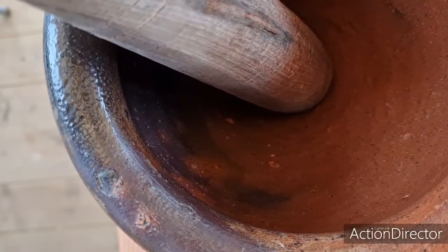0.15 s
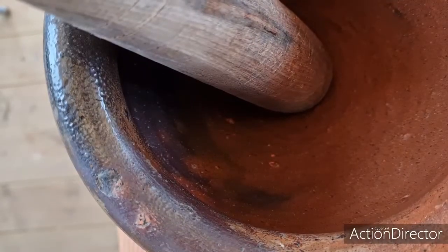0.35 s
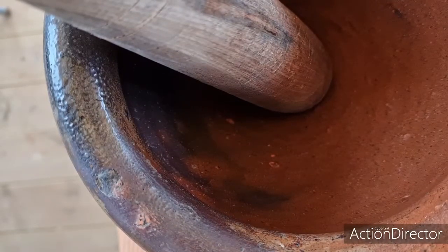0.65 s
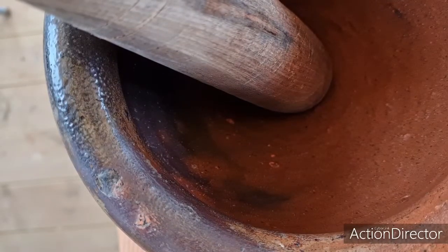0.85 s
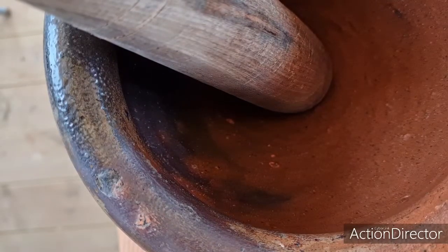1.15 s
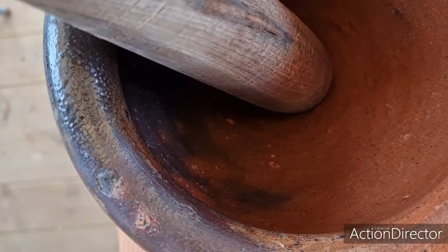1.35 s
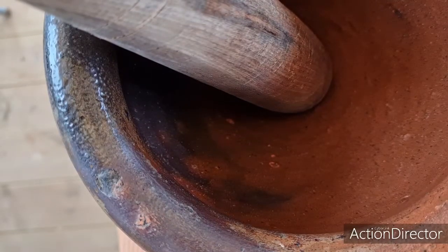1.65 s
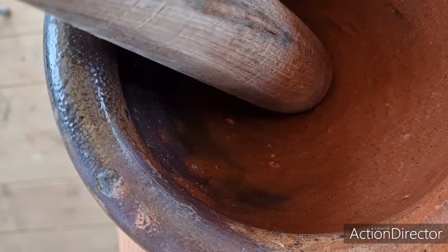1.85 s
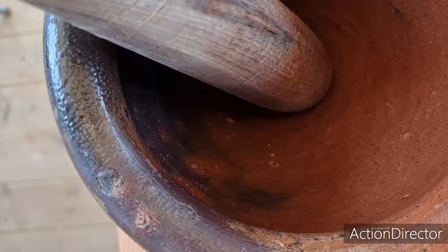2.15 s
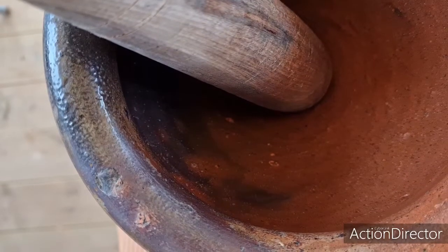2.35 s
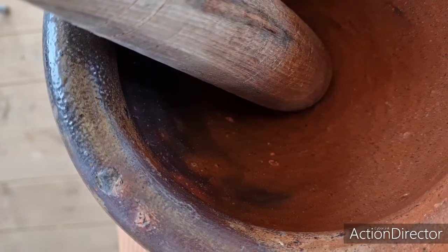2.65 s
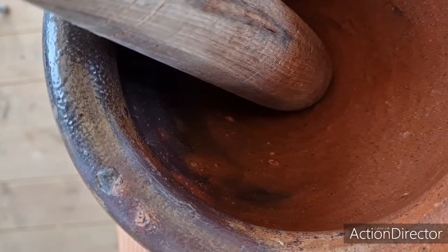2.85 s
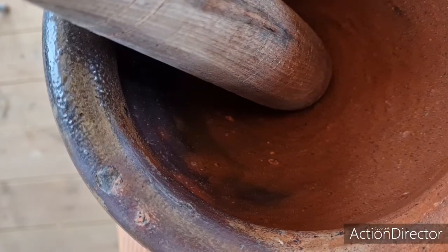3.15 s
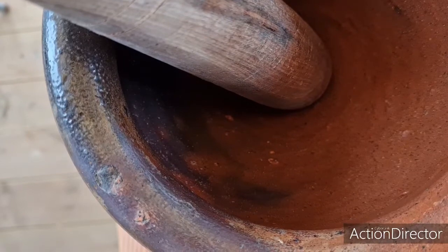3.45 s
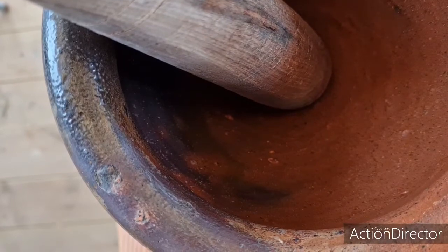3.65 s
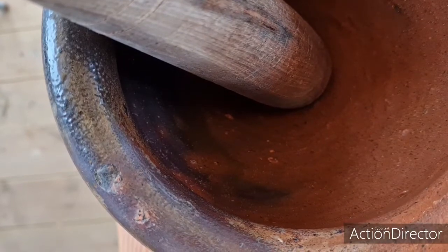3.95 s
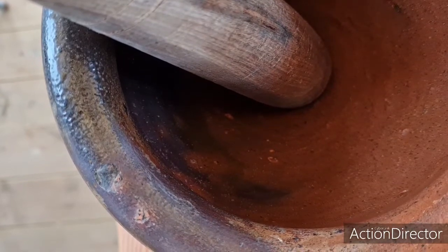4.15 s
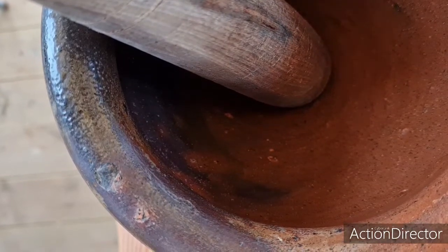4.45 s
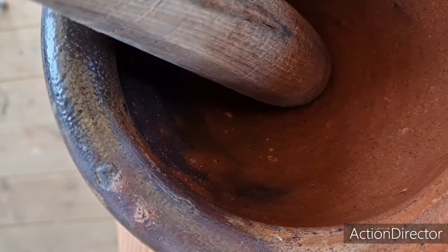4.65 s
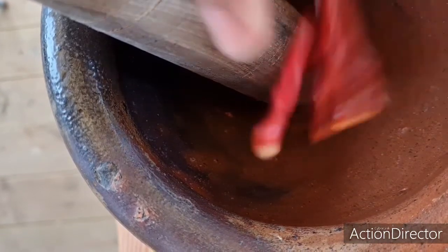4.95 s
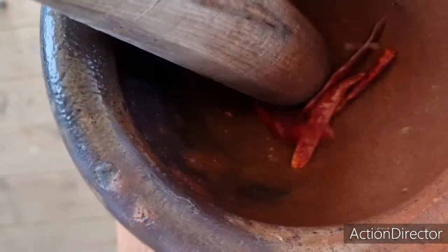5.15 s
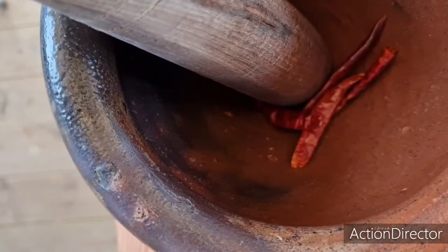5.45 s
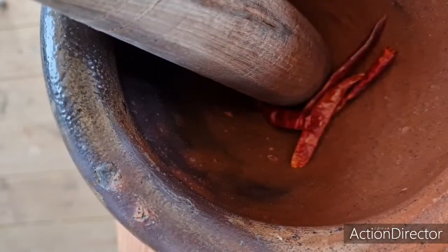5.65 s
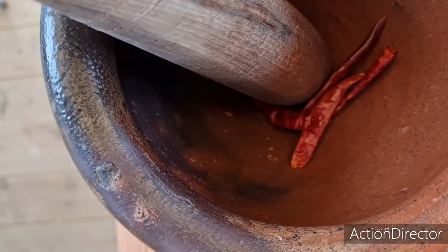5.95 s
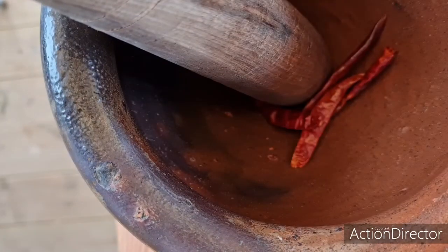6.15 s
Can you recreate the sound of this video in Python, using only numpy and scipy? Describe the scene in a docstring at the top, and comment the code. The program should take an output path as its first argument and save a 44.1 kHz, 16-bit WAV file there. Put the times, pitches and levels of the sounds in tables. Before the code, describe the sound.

Soft, low room noise of a quiet kitchen runs throughout. In the first 0.5 seconds come faint far bumps and scuffs, then a compact dull thud at about 0.44. After a pause, a light swish starts near 1.2, and between 1.4 and 1.75 there is a wet gulp: sticky clicks and small gliding, bubbly tones, trailed by faint swishes. From 2.0 to 4.4 a hand rubs close to the microphone in uneven hissing strokes, with sharp plastic-like ticks, strongest around 3.0 to 3.5. A faint deep motor hum swells after 3.5, highest near 4.8. At 5.0 to 5.3 dried chilies fall into a clay bowl, a quick bright papery rustle and crackling taps with short earthen ringing, leaning left. Rubbing and ticks return from 5.5 to 6.0 as the hum fades; a last small tick comes at 6.24. Close, dry stereo, slight room tail.

```python
"""Far bumps and a dull thud come first, under the soft noise of a quiet kitchen; all are shaped noise or sine.
Swishes, wet clicks and a gulp of gliding tones follow, then a hand rubs and ticks close to the microphone:
friction is dense random slips, each tick a spray of slips that rings the casing. Dried chilies rustle and
drop into a clay bowl, heard through its resonances, and the rubbing returns while a far motor swells and fades."""
import sys
import numpy as np
from scipy import signal
from scipy.io import wavfile

SR = 44100
rng = np.random.default_rng(int(sys.argv[2]) if len(sys.argv) > 2 else 0)


def to_wav(sig):
    """Store sig (one row per channel, or 1-D mono) as 16-bit WAV at the path in sys.argv[1].

    Samples outside -1..1 are clipped; the rate is SR.
    """
    pcm = np.clip(np.atleast_2d(sig), -1, 1) * 32767
    pcm = np.round(pcm).astype(np.int16)
    wavfile.write(sys.argv[1], SR, pcm.T)  # frames by channels


N = 276948

# likeness of left and right over pitch: pitch_hz, likeness (1 same, 0 unrelated)
LIKENESS = [(40, 0.84), (200, 0.91), (700, 0.19), (2500, 0), (6000, 0), (16000, 0.11)]
# resonances of the wet clicks and the gulp's squelch: pitch_hz, width_hz, level_db
CAVITY_MODES = [(625, 240, -1.5), (1096, 71, -6.5), (2250, 230, 1.5), (2900, 290, 6), (3430, 120, 14),
                (3990, 490, 7.5), (6050, 350, -3), (6530, 700, -1.5), (10800, 2700, -0.5)]
# resonances of the clay bowl: pitch_hz, width_hz, level_db
BOWL_MODES = [(664, 120, 4), (912, 80, 0), (1590, 130, 2.5), (2020, 85, -4), (2624, 110, 8), (2800, 77, 7),
              (3030, 64, 0), (3650, 150, -4), (4010, 85, -5.5), (4700, 99, -7.5), (5650, 260, -4),
              (6500, 240, -13), (7530, 200, -4.5), (9500, 150, -8.5)]
# rubbing strokes of the hand: start_s, attack_s, hold_s, hiss_db, sag_db_per_s,
# rasp_db (re hiss), hollow_db (re hiss), pan_db (left over right)
RUBS = [(2.019, 0.032, 0.23, -69, 1, -10, -3.5, -3.5), (2.37, 0.047, 0.11, -45.5, -37, -11.5, -15.5, -6.5),
        (2.55, .01, .13, -57.5, 46, -8.5, -7.5, -1.5), (2.91, 0.036, 0.022, -63, 0, -9, -6, 0),
        (2.97, 0.033, 0.23, -38, 20, -4, -15.5, 0.5), (3.232, 0.021, 0.24, -49.5, -1, -5, -12.5, 1),
        (3.5, .015, 0.09, -52.5, 22, -8, -9, 0), (3.724, .008, .21, -49, -15, -6, -12, 0),
        (3.965, .02, 0.022, -42, 50, -11.5, -17.5, 1.5), (4.071, .012, .13, -54.5, -4, -2.5, -3.5, 0),
        (4.245, .015, 0.017, -42, 32, -12.5, -7, -1.5), (4.32, 0.019, .12, -71.5, 0, -8.5, -3, 2),
        (5.504, 0.036, .05, -35.5, 0, -3, -16, 1.5), (5.6, .02, 0.22, -46.5, 32, -2, -17, 1),
        (5.886, 0.024, 0.069, -51, -2, -3, -10.5, 0)]


def from_db(db):
    """Decibels to amplitude gain."""
    return 10 ** (np.asarray(db) / 20)


def rms_one(x):
    """Scale to unit RMS over all samples and channels."""
    return x / np.sqrt(np.mean(x ** 2) + 1e-30)


def in_time(rows):
    """Join (time in s, value) rows by straight lines over the whole scene."""
    s, values = np.transpose(rows)
    return np.interp(np.arange(N) / SR, s, values)


def at_hz(points, hz):
    """Read a (pitch in Hz, value) table on a log-frequency axis."""
    table_hz, values = np.array(points).T
    return np.interp(np.log(hz), np.log(table_hz), values)


def band(x, low_hz, high_hz):
    """Causal band-pass."""
    edges_hz = [low_hz, min(high_hz, .48 * SR)]
    return signal.sosfilt(signal.butter(3, edges_hz, "band", fs=SR, output="sos"), x)


def drift(rate_hz):
    """Random curve through rate_hz knots a second, with a spread near 1."""
    knots = rng.standard_normal(int(N / SR * rate_hz) + 2)
    return np.interp(np.arange(N) / SR * rate_hz, np.arange(len(knots)), knots)


def pair(x, alike):
    """Mix two unrelated signals into left and right with the given likeness."""
    alike = np.clip(alike, -1, 1)
    middle = np.sqrt((1 + alike) / 2) * x[0]
    side = np.sqrt((1 - alike) / 2) * x[1]
    return middle + side * np.array([[1], [-1]])


def panned(x, pan_db):
    """Tilt left against right at constant power; positive leans left."""
    gains = from_db(np.array([[.5], [-.5]]) * pan_db)
    return x * gains / np.sqrt(np.mean(gains ** 2, axis=0))


def add(out, s, sound):
    """Mix a short sound in at time s."""
    at = max(round(s * SR), 0)
    out[:, at:at + sound.shape[-1]] += sound[..., :out.shape[-1] - at]


def resonate(x, hz, width_hz):
    """One two-pole resonance with gain 1 on top."""
    r = np.exp(-np.pi * width_hz / SR)
    feed = np.array([1, 0, -1]) * (1 - r * r) / 2
    back = [1, -2 * r * np.cos(2 * np.pi * hz / SR), r * r]
    return signal.lfilter(feed, back, x + 1e-18)


def body(x, modes, direct_db):
    """The contact is heard directly and through the resonances of what it touches."""
    ringing = sum(from_db(db) * resonate(x, hz, width) for hz, width, db in modes)
    return from_db(direct_db) * x + ringing


def grains(size, per_s, spread_db):
    """Tiny slips of uneven size; each reaches left and right with a strength of its own."""
    sizes = from_db(spread_db * np.minimum(rng.exponential(1, size), 4))
    slipping = rng.random(size) < per_s / SR
    return slipping * sizes * rng.standard_normal((2, size))


def friction(gains, hollow_hz, modes, per_s, spread_db, flutter_db, direct_db, hollow_width_hz):
    """Dense slips under an unsteady pressure: hiss, a rasp in the body and a hollow air resonance."""
    hiss, rasp, hollow = gains
    slips = grains(N, per_s, spread_db) * from_db(flutter_db * drift(110))
    rung = from_db(direct_db) * slips
    for hz, width, db in modes:
        # the contact point wanders, so each resonance comes and goes
        rung = rung + from_db(db + 5.8 * drift(25)) * resonate(slips, hz, width)
    out = hiss * rms_one(band(rung, 4000, 16000))
    out += rasp * pair(rms_one(band(rung, 1435, 4000)), 0.27)
    cavity = rms_one(resonate(slips, hollow_hz, hollow_width_hz))
    cavity = cavity + 0.26 * rms_one(band(slips, 260, 1100))
    return out + hollow * pair(rms_one(band(cavity, 180, 1300)), 0.69)


def pressure(strokes, release_db_per_s):
    """Stereo gains of hiss, rasp and hollow: each stroke presses in, sags while held and lets go."""
    power, t = np.zeros((3, 2, N + SR)), np.arange(SR) / SR
    for start, attack, hold, db, sag, rasp_db, hollow_db, pan in strokes:
        press = np.sin(np.pi / 2 * np.minimum(t / attack, 1)) ** 2
        sag_db = sag * np.clip(t - attack, 0, hold)
        release_db = release_db_per_s * np.maximum(t - attack - hold, 0)
        shape = press * from_db(db - sag_db - release_db)
        for layer, share_db in zip(power, (0, rasp_db, hollow_db)):
            add(layer, start, panned(from_db(share_db) * shape, pan) ** 2)  # overlaps add in power
    return np.sqrt(power[..., :N])


def contacts(table, modes, direct_db, crush_db, crush_stretch, stretch, rise_s, arch_db):
    """Each contact is a low thump, a snap and a dying spray of slips that set the body ringing."""
    # one thump band, then three snap bands: low_hz, high_hz
    bands_hz = [(200, 1050), (1600, 4000), (4000, 8000), (8000, 16000)]
    ring_lift_db = 5.5  # for the band that holds the strongest ring
    out, t = np.zeros((2, N)), np.arange(SR // 10) / SR
    first = t < .012  # levels hold for the first 12 ms
    for s, db, bright_db, thump_db, pan, length, *ring_hz in table:
        spray = grains(len(t), 30000, 1.4) * from_db(-60 * t / (length * stretch))
        crush_fall = from_db(-60 * t / (length * crush_stretch))
        spray += from_db(crush_db) * rng.standard_normal((2, len(t))) * crush_fall
        spray *= 1 - np.exp(-(t / rise_s) ** 2)  # the contact takes a moment to build
        favoured = [(hz, 0.04 * hz, 7) for hz in ring_hz]  # the spot that is hit favours one resonance
        rung, hit = body(spray, modes + favoured, direct_db), 0
        # a tilted arch over three octaves
        snap_db = [db + bright_db * octave - arch_db * octave ** 2 for octave in (-1, 0, 1)]
        for (low, high), band_db in zip(bands_hz, [thump_db] + snap_db):
            part = pair(band(rung, low, high), at_hz(LIKENESS, np.sqrt(low * high)))
            part = part / np.sqrt(np.mean(part[:, first] ** 2, axis=1, keepdims=True) + 1e-30)
            lift_db = ring_lift_db * any(low <= hz < high for hz in ring_hz)
            hit = hit + from_db(band_db + lift_db) * part
        add(out, s - rise_s, panned(hit, pan))
    return out


def background():
    """Soft room noise in half-octave bands, and the hum of a far motor with its second harmonic."""
    # colour of the quiet room: pitch_hz, relative density_db
    colour = [(25, -14), (45, -1), (100, -2.5), (180, -10.5), (280, -3.5), (450, -8), (780, -3.5),
              (1300, -13), (2500, -21), (5000, -21.5), (7300, -16), (10000, -23.5), (15500, -23.5)]
    # swell of the room noise: time_s, change_db
    air_swell = [(0, -5), (.6, 0.5), (1.15, -0.5), (2.0, 1), (4.8, 0.5), (6.28, -1.5)]
    # the far motor swells and fades: time_s, fundamental_peak_db
    hum_level = [(0, -100), (3.4, -90), (4.0, -77), (4.8, -73), (5.5, -75.5), (5.9, -88.5), (6.28, -90)]
    air_db, hum_hz = -69.5, 43
    air, edges_hz = 0, 22 * 2 ** np.arange(0, 9.6, .5)
    white = rng.standard_normal((2, 2, N))
    for k, (low, high) in enumerate(zip(edges_hz, edges_hz[1:])):
        hz = np.sqrt(low * high)
        gain = from_db(at_hz(colour, hz) + 0.89 * drift(18))
        # neighbouring bands use unrelated noise
        air = air + gain * pair(band(white[k % 2], low, high), at_hz(LIKENESS, hz))
    phase = 2 * np.pi * np.cumsum(hum_hz * (1 + 0.0051 * drift(2.8))) / SR
    hum = from_db(in_time(hum_level)) * (np.sin(phase) + 1.1 * np.sin(2 * phase))
    return panned(from_db(air_db + in_time(air_swell)) * rms_one(air) + hum, -0.89)


def bumps():
    """Far bumps and scuffs are decaying bands of noise; one compact thud is a fast-dying sine."""
    # far bumps and scuffs: start_s, peak_db, lowest_hz, highest_hz, t60_s
    knocks = [(.04, -55.5, 38, 69.4, 0.09), (.175, -58.5, 40, 85, 0.14), (0.279, -52.5, 1350, 2060, 0.23),
              (0.282, -52.5, 242, 1170, 0.38), (0.436, -44, 161, 570, 0.33), (.436, -55.5, 600, 1880, 0.12),
              (0.489, -58, 400, 2110, 0.33), (.53, -58, 110, 261, 0.37), (6.001, -62.5, 31.9, 64.6, .45)]
    thud_s, thud_db, thud_hz, thud_t60_s = .4358, -32.5, 310, 0.025
    out, t = np.zeros((2, N)), np.arange(SR // 2) / SR
    for s, db, low_hz, high_hz, t60 in knocks:
        push = pair(rng.standard_normal((2, len(t))), 0.54) * from_db(-60 * t / t60)
        knock = band(push, low_hz, high_hz)
        add(out, s, from_db(db) * knock / np.abs(knock).max())
    fall = from_db(thud_db - 60 * t / thud_t60_s)
    onset = np.minimum(2 * thud_hz * t, 1)  # rises over half a cycle
    add(out, thud_s, fall * np.sin(2 * np.pi * thud_hz * t) * onset)
    return out


def casing_ticks(table):
    """Firm little contacts that ring in the microphone casing."""
    # resonances of the tapped casing: pitch_hz, width_hz, level_db
    casing = [(577, 70, -3.5), (782.7, 28.6, 8.5), (2150, 230, -9), (2927, 89, 5.5), (3370, 74, -10.5),
              (5580, 240, -1.5), (7320, 270, -2), (9520, 200, -4), (11500, 1600, -7)]
    return contacts(table, casing, direct_db=-9.5, crush_db=-18, crush_stretch=7.0, stretch=2.1,
                    rise_s=.0005, arch_db=4.5)


def handling_ticks():
    """Ticks of the hand close to the microphone, each favouring one ring of the casing."""
    # handling ticks: start_s, level_db (4-8 kHz before ring lift), brightness_db_per_octave, thump_db,
    # pan_db (left over right), length_s (before stretch), strongest_ring_hz
    ticks = [(.436, -74, 0.5, -60, 0, .006, 1810), (2.0895, -69, -3, -65, -6, 0.011, 4370),
             (2.1498, -47.5, -6.5, -55, 2.5, 0.015, 3290), (2.513, -45.5, -1, -80, -6, .01, 7970),
             (2.533, -53, -9.5, -80, 6, .009, 5050), (2.6971, -62.5, -8, -61, 1.5, 0.027, 3310),
             (2.8083, -72, -6, -75, 3, .006, 3350), (3.09, -43.5, -8, -72, 3, 0.015, 5760),
             (3.1092, -32.5, -4, -48.5, 0, 0.0055, 5600), (3.1735, -34.5, .5, -51.5, -3, .022, 2830),
             (3.3576, -46.5, -6, -56, -5, 0.025, 2910), (3.4155, -34.5, -2, -51, -2, 0.0088, 2900),
             (3.4728, -46, -7, -58, -6, .005, 2950), (3.5601, -55.5, 0, -75, 5, .007, 5340),
             (3.5921, -51.5, 3, -66, 3, .01, 2430), (3.6749, -61, 5.5, -73, -1, 0.0035, 6300),
             (3.847, -48, 2, -64, 1, 0.012, 5110), (3.8719, -42, 4, -60, 2, .012, 3300),
             (3.9717, -43.5, 5.5, -85, 1, 0.0051, 5500), (3.984, -47, 6, -55, -9, 0.0072, 5610),
             (4.0849, -47.5, 0, -68, 2, 0.0072, 2370), (4.1209, -38, -7, -43.5, -4, 0.01, 3110),
             (4.141, -49.5, -12.5, -53, -1, 0.036, 3040), (4.1732, -50.5, -15, -48, -0.5, .005, 3320),
             (4.2042, -49.5, 9.5, -53.5, 0, 0.02, 6160), (4.2436, -51.5, 3, -77, 14, .005, 5000),
             (4.259, -51, 5, -55.5, 4, .009, 7320), (4.283, -46, 7.5, -66, 6, 0.0062, 3720),
             (4.4152, -65, 11.5, -64, 3, .004, 7400), (4.442, -67.5, 7, -65.5, 2, .025, 5240),
             (4.5668, -69, 11, -87, -2.5, 0.024, 7630), (4.8756, -69.5, -16, -56.5, 8, 0.011, 1973),
             (5.6619, -43, -4, -76, -1, .035, 2990), (5.6655, -41, -1, -67, 5, 0.0066, 3070),
             (5.704, -51, -8, -70, -14, .008, 2930), (5.7302, -47.5, -2, -61, 1, 0.0023, 5400),
             (5.805, -40, 1, -63, -5, .011, 2960), (5.8794, -46, -2, -66, -4, 0.0068, 2900),
             (5.9118, -45.5, 2.5, -61, 1, .0076, 5200), (5.9737, -52.5, 2, -61, 4, 0.0055, 3500),
             (6.2376, -56, -2, -74, 0.5, 0.0025, 5600)]
    return casing_ticks(ticks)


def swishes():
    """Soft friction around the gulp, with very dense slips and a broad hollow resonance."""
    # swishes: start_s, attack_s, hold_s, hiss_db, sag_db_per_s,
    # rasp_db (re hiss), hollow_db (re hiss), pan_db (left over right)
    strokes = [(1.17, 0.11, .01, -62.5, 0, -19, -7.5, -4), (1.3, 0.039, 0.16, -70.5, -2, -5.5, 2.5, -2.5),
               (1.47, .04, 0.16, -65.5, 20, -6, 8.5, -3), (1.75, 0.021, 0.038, -60, 30, -14, -13, -4),
               (1.88, 0.016, .04, -75, 0, -5, 2, -1)]
    # resonances of the swishes: pitch_hz, width_hz, level_db
    swish_modes = [(3900, 210, -2), (4320, 230, 6.5), (7100, 580, -5), (11800, 2300, -12)]
    gains = pressure(strokes, release_db_per_s=220)
    return friction(gains, 430, swish_modes, per_s=18000, spread_db=2.0, flutter_db=3.5,
                    direct_db=-8, hollow_width_hz=370)


def wet_clicks():
    """Small wet contacts around the gulp, heard mostly through the cavity resonances."""
    # wet clicks: start_s, level_db (4-8 kHz), brightness_db_per_octave, thump_db,
    # pan_db (left over right), length_s (before stretch)
    clicks = [(1.434, -50, -1, -76.5, -6, 0.0035), (1.46, -49, -8, -44.5, -6, 0.0066),
              (1.4644, -32.5, -1.5, -42, 0, .012), (1.4795, -43.5, -2, -43, -15, .0046),
              (1.501, -54, -9, -50, 1, 0.0054), (1.6305, -50, -11, -40, -8, .0035),
              (1.6425, -42, -9, -44, -2.5, 0.0099), (1.705, -67.5, 4, -54, -5, .023),
              (1.77, -56.5, 3.5, -66, -9, 0.0066), (1.795, -67, 16, -80, -18, .008),
              (1.8091, -64, 15, -71, -8, 0.022)]
    return contacts(clicks, CAVITY_MODES, direct_db=-17.0, crush_db=-18.0, crush_stretch=11.2,
                    stretch=2.0, rise_s=.0005, arch_db=3.5)


def gulp():
    """Pockets of air swell, tremble and glide in pitch as they change size."""
    # glugs of the gulp: start_s, pitch_hz, glide_octaves_per_s, peak_db (before trembling), swell_s, t60_s
    glugs = [(1.464, 640, 2.5, -44, 0.013, 0.13), (1.501, 289, -8, -26.5, 0.0017, 0.033),
             (1.518, 247, -2.5, -40, 0.0025, 0.1), (1.558, 434, -12.5, -42.5, 0.0092, 0.084),
             (1.572, 308, 3, -38, 0.015, 0.17), (1.630, 290.7, 3, -23, 0.0013, 0.095),
             (1.630, 770, 2, -27, 0.0098, 0.058), (1.642, 284, 9, -21.5, 0.0059, 0.042),
             (1.660, 759, 0.5, -47, 0.024, 0.18), (1.672, 300, 2, -40.5, 0.014, 0.039),
             (1.697, 404, 14.5, -30, 0.0092, 0.023), (1.712, 494, 3, -38.5, 0.0054, 0.073)]
    out, t = np.zeros((2, N)), np.arange(SR // 4) / SR
    for s, hz, glide, db, swell, t60 in glugs:
        octaves = glide * np.minimum(t, .04) + 0.044 * drift(154)[:len(t)]  # the glide stops after 40 ms
        phase = 2 * np.pi * np.cumsum(hz * 2 ** octaves) / SR
        fall_db = -60 * np.maximum(t - swell, 0) / t60
        shape = np.minimum(t / swell, 1) * from_db(fall_db + 1.9 * drift(192)[:len(t)])
        squelch = rms_one(band(body(grains(len(t), 3400, 1.7), CAVITY_MODES, 3.6), 400, 3100))
        glug = from_db(db) * shape * (np.sin(phase) + from_db(-25.0) * squelch)
        add(out, s, panned(glug, -3.5))
    return band(out, 130, 7900)


def rubbing():
    """The strokes of the hand, coloured by the spot they pass over."""
    # each group of strokes rubs another spot: from_s, to_s, hollow_hz,
    # resonances [(pitch_hz, width_hz, level_db)]
    spots = [(2.0, 2.8, 674, [(2450, 250, -1.5), (4970, 150, -10), (7900, 140, -11), (11200, 590, -12)]),
             (2.8, 3.65, 570, [(1660, 66, -34), (2150, 97, 1.5), (2570, 67, 0.5), (3370, 120, -3),
             (5700, 1100, -12.5), (7630, 330, -11), (11800, 800, -14)]), (3.65, 4.9, 595, [(2500, 260, -12),
             (3450, 200, -22.5), (5130, 220, -5.5), (5950, 490, -3.5), (7700, 220, -8.5),
             (11500, 790, -9.5)]), (5.4, 6.27, 581, [(2095, 84, -7.5), (2446, 220, 0.5), (3380, 210, -8),
             (5200, 300, -3.5), (6060, 123, -1), (7640, 850, -9.5), (11300, 1200, -13)])]
    out = 0
    for start, stop, hollow_hz, modes in spots:
        strokes = [row for row in RUBS if start <= row[0] < stop]
        gains = pressure(strokes, release_db_per_s=430)
        out = out + friction(gains, hollow_hz, modes, per_s=6000, spread_db=1.7, flutter_db=3.0,
                             direct_db=-7, hollow_width_hz=29.0)
    return out


def snags():
    """The skin snags at random in a stroke and lets go with a tiny tick, stronger in a firmer stroke."""
    per_s, snag_db, spread_db = 12, -8.5, 2  # level re the hiss of the stroke
    thump_db, length_s, ring_hz = -17.5, .007, 5170  # thump re the snag; length before stretch
    rows = []
    for start, attack, hold, db, *_, pan in RUBS:
        waits = np.cumsum(rng.exponential(1 / per_s, size=8))
        for wait, strength in zip(waits, rng.standard_normal(size=8)):
            level = db + snag_db + spread_db * strength
            if wait < hold:
                rows.append((start + attack + wait, level, 0, level + thump_db, pan, length_s, ring_hz))
    return casing_ticks(rows)


def rustle():
    """Dry chili skins slide in the bowl: friction through the bowl's resonances."""
    # slides: start_s, attack_s, hold_s, hiss_db, sag_db_per_s,
    # rasp_db (re hiss), hollow_db (re hiss), pan_db (left over right)
    slides = [(4.91, 0.023, .07, -63, -30, -6, -3, 8), (5.01, 0.011, 0.049, -47, 0, -11, -12.5, 3),
              (5.103, .018, 0.031, -27, 0, -1, -21, 5.5), (5.16, 0.0094, 0.026, -32, 20, -2, -22, 6),
              (5.2, 0.012, 0.088, -47, 10, -3, -13.5, 4), (5.35, .008, .008, -64, 0, -2, -9, 3)]
    gains = pressure(slides, release_db_per_s=599.5)
    return friction(gains, 750, BOWL_MODES, per_s=4100, spread_db=2.0, flutter_db=4.5,
                    direct_db=-3.0, hollow_width_hz=120)


def chili_drops():
    """Chilies land on the clay with softer-edged contacts that ring the bowl."""
    # drops: start_s, level_db (4-8 kHz), brightness_db_per_octave, thump_db,
    # pan_db (left over right), length_s
    drops = [(4.9769, -56, 5.5, -78, 4.5, .033), (5.0113, -36.5, 5, -61.5, 8, .0027),
             (5.021, -43.5, 4, -65, 8, .027), (5.055, -33, 4, -46.5, 3.5, .023),
             (5.0642, -33.5, 7.5, -56, 9.5, .02), (5.1035, -30.5, 5, -47.5, 3.5, .007),
             (5.1126, -25.5, 4.5, -61, 7, .016), (5.128, -31.5, -9.5, -58, 17.5, .01),
             (5.136, -29.5, -5.5, -63, 2, .016), (5.1435, -27, 2, -51, 5, .011),
             (5.1765, -35, 2.5, -45, 1.5, .01), (5.187, -37, 0.5, -44, 2, .015),
             (5.193, -42.5, 5, -57, -6, .019), (5.2528, -50.5, -4, -64, 9, .006),
             (5.2877, -44, 3.5, -61, 9, .018)]
    return contacts(drops, BOWL_MODES, direct_db=-6, crush_db=-20.0, crush_stretch=5, stretch=1.0,
                    rise_s=.0011, arch_db=3.0)


def room(x, t60, wall_hz):
    """A short diffuse tail of decaying noise, different in each channel."""
    t = np.arange(SR // 2) / SR
    tail = band(rng.standard_normal((2, len(t))), 150, wall_hz)
    tail = tail * from_db(-60 * t / t60) * (t > .005)
    return signal.fftconvolve(x, tail / np.sqrt(np.sum(tail ** 2) / 2), axes=1)[:, :N]


def scene():
    """Bumps, gulp, handling and falling chilies in the room; air and snags carry no tail."""
    air = background()
    near = bumps() + handling_ticks() + swishes() + wet_clicks() + gulp()
    near = near + rubbing() + rustle() + chili_drops()
    return near + from_db(-19) * room(near, t60=.2, wall_hz=7050) + air + snags()


def record(dry):
    """A steep elliptic low-pass cuts the top."""
    cutoff_hz = 15700
    return signal.sosfilt(signal.ellip(10, .2, 70, cutoff_hz, fs=SR, output="sos"), dry)


dry = scene()
out = record(dry)
to_wav(out)
```